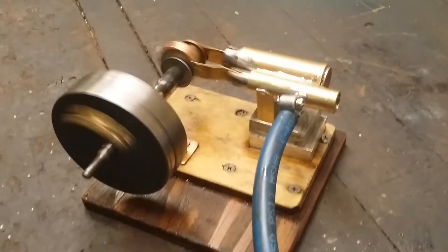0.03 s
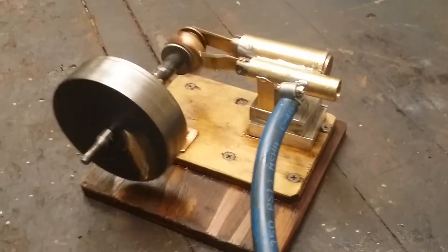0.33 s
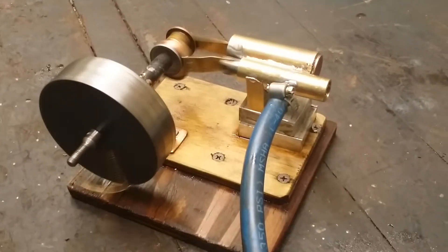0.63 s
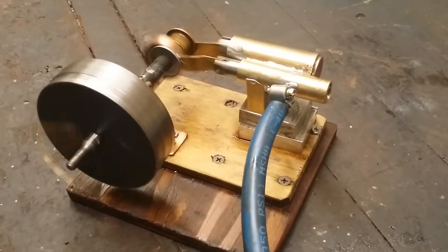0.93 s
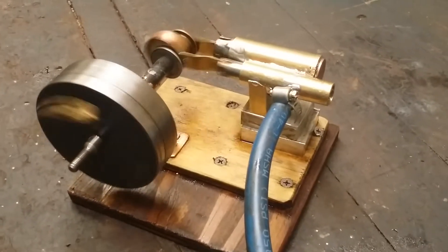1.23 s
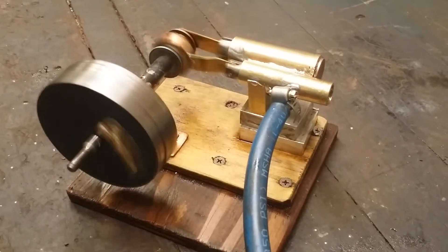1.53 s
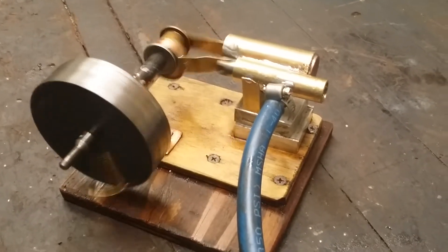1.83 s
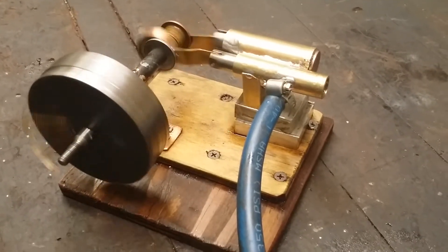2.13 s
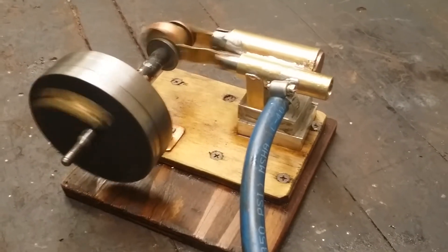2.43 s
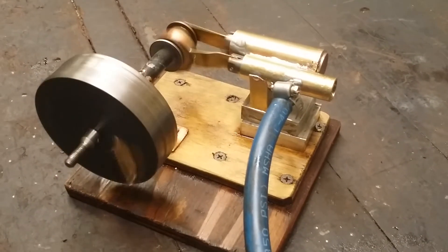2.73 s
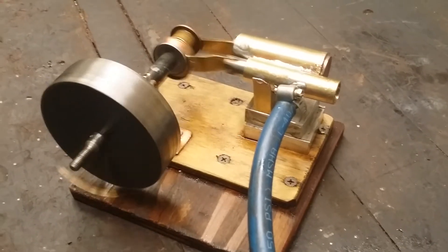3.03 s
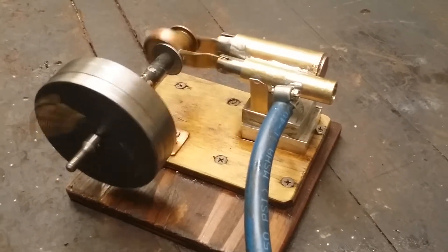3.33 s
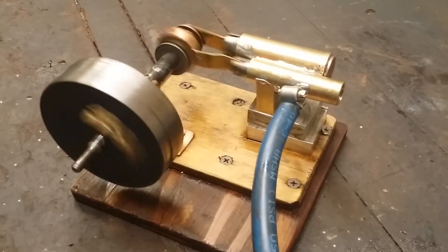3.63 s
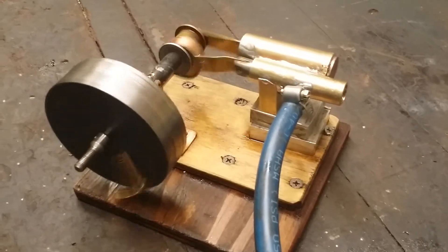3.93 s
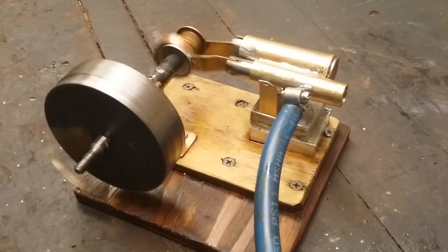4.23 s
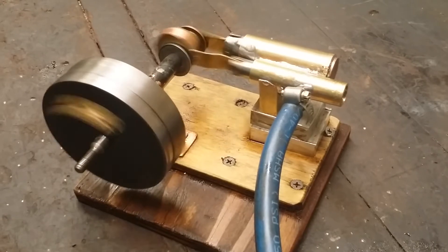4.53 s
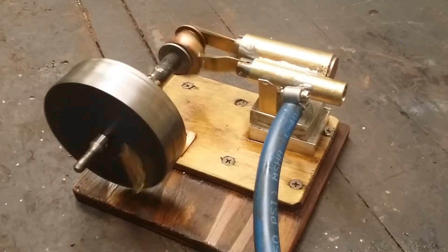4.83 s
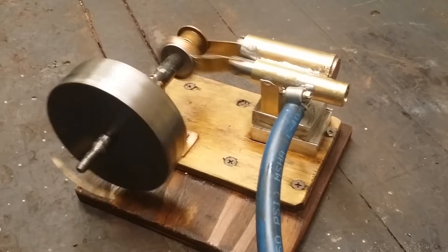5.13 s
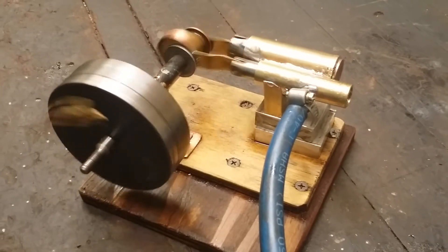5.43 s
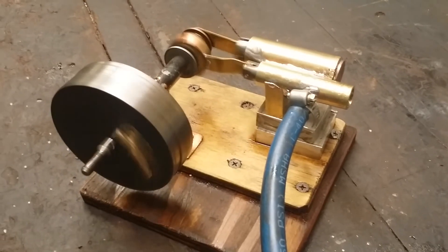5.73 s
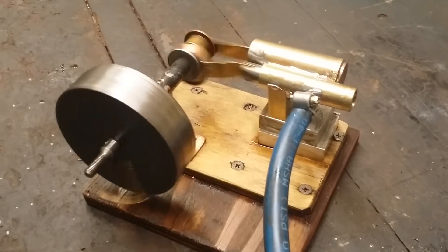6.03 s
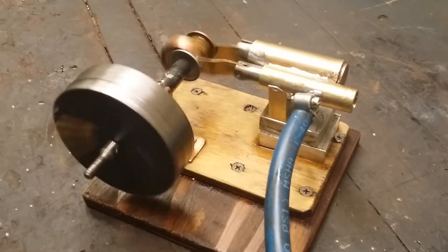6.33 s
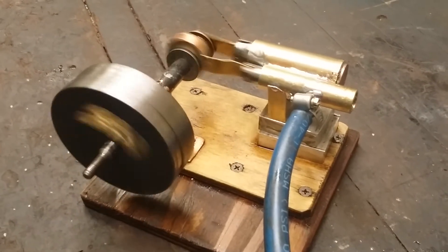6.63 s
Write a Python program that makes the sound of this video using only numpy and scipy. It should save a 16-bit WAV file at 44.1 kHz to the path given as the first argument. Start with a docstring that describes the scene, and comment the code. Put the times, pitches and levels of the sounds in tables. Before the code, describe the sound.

A small homemade piston engine, fed by a hose, runs throughout at almost six turns a second. Each turn gives a bright hiss from the valve, then a slightly duller exhaust puff with two light, high rattles of loose metal linkage. The shaft rumbles faintly into the base board. It is heard close up indoors, over a steady low hum and a faint whine.

```python
"""A small homemade piston engine, fed through a hose, turns its flywheel almost six times a second.
Each turn gives a bright jet at the valve, then a duller exhaust chuff with two rattles of loose linkage.
The shaft rumbles into the base board, over a low room hum. Two close microphones hear it with
reflections off the indoor floor, the right one more of the jet."""
import sys
import numpy as np
from scipy import signal
from scipy.fft import rfft, irfft, next_fast_len
from scipy.io import wavfile
from scipy.ndimage import map_coordinates

SR = 44100
rng = np.random.default_rng(int(sys.argv[2]) if len(sys.argv) > 2 else 0)


def wrap_up_sound(samples):
    """Save the sound to the file named by the first command line argument, as 16-bit audio."""
    columns = np.atleast_2d(samples).T
    # keep every value between -1 and 1, then stretch to whole-number steps
    tamed = np.clip(columns, -1, 1)
    steps = np.round(tamed * 32767).astype(np.int16)
    wavfile.write(sys.argv[1], SR, steps)


N = 295470


def amp(db):
    return 10 ** (np.asarray(db) / 20)


def wobble(rate_hz):
    """Smooth random curve, rate_hz knots a second."""
    knots = rng.standard_normal(int(N * rate_hz / SR) + 4)
    return map_coordinates(knots, [np.arange(N) * rate_hz / SR])


def curve(table):
    """A (time_s, value) table at every sample."""
    return np.interp(np.arange(N) / SR, *np.transpose(table))


def through_turn(table, angle):
    """An (angle_turns, level_db) table, repeated every turn."""
    return np.interp(angle, *np.transpose(table), period=1)


def each_turn(angle):
    """One random value per turn."""
    turn = angle.astype(int)
    return rng.standard_normal(turn[-1] + 1)[turn]


def along(table, hz):
    """Table columns read on a log-frequency axis."""
    table_hz, *columns = np.transpose(table)
    return np.array([np.interp(np.log(hz), np.log(table_hz), c) for c in columns])


def filtered(x, response):
    """x times a response of frequency."""
    size = next_fast_len(N + SR // 5)
    hz = np.fft.rfftfreq(size, 1 / SR) + 1
    return irfft(rfft(x, size) * response(hz), size)[..., :N]


def colour_db(hz):
    """Board, brass tubes and nearby surfaces colour the sound."""
    # peaks and notches: centre_hz, width_hz, left_db, right_db
    peaks = [(177, 9, 3, 4), (204, 9, 4, 2), (265, 13, 4, 3), (404, 16, 4, 2), (620, 45, 1, 2),
             (1664.0, 80.0, 4.6, 2.1), (2444.0, 239.0, 5.3, -2.5), (4020.0, 132.0, -3.6, 2.3),
             (4264.0, 85.0, -4.2, -3.2), (5154.0, 65.0, 2.8, -4.2), (5848.0, 156.0, 1.0, 3.8),
             (6293.0, 99.0, -2.2, -4.7), (6597.0, 144.0, 3.5, -2.9), (7015.0, 164.0, -0.6, -7.1),
             (7370.0, 148.0, -2.2, 3.6), (7870.0, 132.0, 0.3, 5.1), (9376.0, 146.0, -5.9, 1.5),
             (11170.0, 454.0, -3.7, 2.3), (12120.0, 213.0, 0.7, -5.7)]
    centre_hz, width_hz, *db = np.transpose(peaks)
    distance = np.minimum(np.abs(hz - centre_hz[:, None]) / width_hz[:, None], 10)
    return np.array(db) @ np.exp(-distance ** 2)


def radiate(drive, spectrum, direct=1, skirt_db_per_octave=60):
    """Shaped stereo noise of strength drive; direct scales the left-right coherence."""
    # microphone pair: freq_hz, coherence, left_lead_rad
    pair = [(190, .9, 0), (400, .5, 0), (750, .4, 0), (1400, -.27, 0), (2500, .05, 0), (3700, .6, .1),
            (4600, .55, .6), (5400, .6, -2.3), (6000, .8, -1.3), (6800, .72, -2.2), (8500, .45, -3.1),
            (10000, .45, -1.5), (11500, .35, -2), (13100, .7, -2.4)]

    def to_microphones(hz):
        coherence, lead_rad = along(pair, hz)
        coherence = np.clip(direct * coherence, -1, 1)
        mid, side = np.sqrt((1 + coherence) / 2), np.sqrt((1 - coherence) / 2)
        octaves_outside = np.abs(np.log2(hz / np.clip(hz, spectrum[0][0], spectrum[-1][0])))
        gain = amp(along(spectrum, hz) + colour_db(hz) - skirt_db_per_octave * octaves_outside)
        lead = np.exp(1j * lead_rad)
        return np.array([[mid * lead, side * lead], [mid, -side]]) * gain[:, None]
    noise = rng.standard_normal((2, N)) * np.sqrt(SR / 2)
    return filtered(noise * drive, to_microphones).sum(axis=1)


def crank(start_turns=0.519):
    """Crank angle in turns past valve opening; the flywheel slows a little."""
    # flywheel speed: time_s, turns_per_s
    speed = [(0, 5.932), (1.2, 5.877), (2.2, 5.727), (3.8, 5.734), (4.4, 5.624), (5.2, 5.697), (6.7, 5.667)]
    return start_turns + np.cumsum(curve(speed)) / SR


def exhaust(angle, turn_db, sputter_db=0.9, surge_db=0.86):
    """The returning piston pushes out a dull chuff that sputters and surges."""
    # outflow: angle_turns, level_db
    flow = [(0.03, -17), (0.34, -11), (0.578, 0.5), (0.601, -0.5), (0.651, 2), (0.769, -0.05), (0.887, 0.3),
            (0.978, -6.5)]
    # chuff: freq_hz, left_db, right_db
    spectrum = [(1800.0, -89, -102), (2950, -81, -75), (4030, -70, -66.5), (4790, -69.5, -69),
                (5630, -64, -64), (6720, -62, -62.5), (7950, -73, -62.0), (10300, -94.8, -96),
                (14000.0, -86.0, -73)]
    level_db = through_turn(flow, angle) + turn_db + sputter_db * wobble(400) + surge_db * wobble(90)
    return radiate(amp(level_db), spectrum, direct=1.3)


def jet(angle, turn_db, flutter_db=0.8, spit_db=7, spits_per_s=16, spit_s=0.0003):
    """The valve hisses and spits, long on the power stroke, briefly on the return."""
    # valve flow: angle_turns, level_db
    flow = [(-0.02, -15), (0.018, 1), (0.121, 3.5), (0.218, 2.3), (0.386, 1.8), (0.462, -5.5),
            (0.564, -11.5), (0.593, -1), (0.677, -3), (0.737, -11.5), (0.891, -12)]
    # hiss: freq_hz, left_db, right_db
    spectrum = [(2530, -100.9, -99.9), (3790, -80, -75.5), (6400, -69, -74), (8170, -79.0, -65.5),
                (10700, -72, -61.5), (11650, -73, -61), (12800, -67.5, -59), (14340, -72, -64.5)]
    # largest spits: start_s, boost_db
    big_spits = [(2.901, 16), (3.025, 12)]
    spits_db = (rng.random(N) < spits_per_s / SR) * rng.random(N) * spit_db
    for start_s, boost_db in big_spits:
        spits_db[round(start_s * SR)] = boost_db
    spits_db = np.convolve(spits_db, np.ones(round(spit_s * SR)), "same")
    level_db = through_turn(flow, angle) + turn_db + flutter_db * wobble(500) + spits_db
    return radiate(amp(level_db), spectrum)


def brighten(hiss, shelf_db, corner_hz=10500):
    """A harder jet gains most in its top."""
    top = filtered(hiss, lambda hz: 1 / (1 + (corner_hz / hz) ** 10))
    return hiss + (amp(shelf_db) - 1) * top


def slit(angle, turn_db, flutter_db=2.0, waver_db=1.33):
    """A narrow gap sizzles most as the port opens and closes."""
    # gap flow: angle_turns, level_db
    flow = [(0.018, 3), (0.075, -3.5), (0.167, -1.5), (0.3, -8.5), (0.421, 2), (0.55, -11.5), (0.824, -10),
            (0.977, -4.5)]
    # sizzle: freq_hz, left_db, right_db
    spectrum = [(4030, -74.5, -78.5), (6550, -77, -70), (7330, -66, -62.5), (8400, -72.5, -54),
                (9080, -73, -59), (11100, -77, -67.5), (14000.0, -90.4, -83.4)]
    # slow rise: time_s, level_db
    swell = [(0, -2.5), (1.9, -1), (3.5, 0.2), (5, 0.7), (6.7, 1.2)]
    level_db = through_turn(flow, angle) + turn_db + curve(swell)
    level_db += flutter_db * wobble(600) + waver_db * wobble(40)
    return radiate(amp(level_db), spectrum, direct=0.54)


def rattle(angle, turn_db, spectrum, at_turns, rise_turns, fall_turns, scatter_turns, chatter_db):
    """Linkage play is taken up near one crank angle in a burst of uneven contacts."""
    # turns where the linkage seats softly: time_s, level_db
    soft_turns = [(.55, -6), (.89, -8), (2.43, -2.5), (4.0, -3), (4.36, -3)]
    turn = angle.astype(int)
    seating_db = sum(db * (turn == turn[round(time_s * SR)]) for time_s, db in soft_turns)
    past_turns = angle % 1 - at_turns - scatter_turns * each_turn(angle)
    width_turns = np.where(past_turns < 0, rise_turns, fall_turns)
    burst = np.exp(-(past_turns / width_turns) ** 2 / 2)
    contacts = amp(chatter_db * wobble(700))
    contacts /= np.sqrt(np.mean(contacts ** 2))
    return radiate(amp(turn_db + seating_db) * burst * contacts, spectrum)


def tick(angle, turn_db):
    """First linkage rattle of a turn; grows unevenly, drops at the end."""
    # tick: freq_hz, left_db, right_db
    spectrum = [(2830, -103, -76), (4700, -72, -71), (6200, -54, -58.5), (7860, -102, -61),
                (8620, -69, -52), (10150, -85.2, -72), (14000.0, -83.6, -92)]
    # strength: time_s, level_db
    strength = [(0, -1), (1.3, 0), (3.2, 2.5), (4.5, 2.5), (5.2, 1), (6.15, 4), (6.7, -3)]
    return rattle(angle, turn_db + curve(strength), spectrum, at_turns=0.733,
                  rise_turns=0.011, fall_turns=0.025, scatter_turns=0.0064, chatter_db=2.3)


def clack(angle, turn_db):
    """Second linkage rattle, with smoother contacts."""
    # clack: freq_hz, left_db, right_db
    spectrum = [(2010, -75, -62.5), (3500.0, -90, -82), (5060, -68, -75.5), (6110, -47.5, -52),
                (7930, -84, -54), (9500.0, -83, -84.5), (14000.0, -95.0, -74)]
    return rattle(angle, turn_db, spectrum, at_turns=0.816,
                  rise_turns=0.012, fall_turns=0.024, scatter_turns=0.007, chatter_db=0.5)


def bearing(angle, turn_db, grit_db=0.45, shake_db=1.34):
    """The shaft rubs harder under load and shakes the base board."""
    # shaft load: angle_turns, level_db
    shaft_load = [(0.086, 0.47), (0.378, 1.36), (0.483, 1.2), (0.661, 0.3), (0.825, 2.9), (0.924, 3.5)]
    # shaft rub: freq_hz, left_db, right_db
    rub_spectrum = [(393, -73.5, -73.5), (690, -73, -67.5), (1060, -74, -70), (1666, -69, -65),
                    (2107, -76.5, -74.5), (2580, -86.5, -78.5), (5000.0, -94, -94)]
    # board rumble: freq_hz, left_db, right_db
    board_spectrum = [(130, -72, -63.5), (179, -69.5, -69), (252, -72.5, -67.5), (338, -76, -71)]
    load = amp(through_turn(shaft_load, angle) + turn_db)
    rub = radiate(load * amp(grit_db * wobble(250)), rub_spectrum)
    rumble = radiate(load * amp(shake_db * wobble(14)), board_spectrum)
    return rub + rumble


def room(hum_db=0.2, waver_db=2.2, swell_db=0.7):
    """Low noise, a hum whose close tones beat, and a faint, unsteady whine."""
    # background noise: freq_hz, left_db, right_db
    spectrum = [(21.1, -92, -88), (45, -84, -80), (60, -76, -71), (72, -75, -72.5), (89.5, -67.5, -62),
                (112, -75, -69), (140, -68.5, -62), (164, -74, -70.5), (254, -72, -69.5), (407, -77, -72)]
    # hum: pitch_hz, left_db, right_db
    hum_tones = [(118.15, -52, -47), (119.97, -58, -53), (121.2, -62, -57), (239.94, -52.5, -51),
                 (242.4, -62, -60)]
    # whine: pitch_hz, left_db, right_db
    whine_tones = [(359, -53.5, -66), (402, -60, -61.5), (715, -59, -58.5), (2382, -51.5, -74)]
    t = np.arange(N) / SR

    def tone(hz, drift_rad):
        return np.sqrt(2) * np.sin(2 * np.pi * (hz * t + rng.random()) + drift_rad * wobble(5))
    hum = sum(np.outer(amp(db), tone(hz, drift_rad=0.027)) for hz, *db in hum_tones)
    whine = sum(np.outer(amp(db), tone(hz, drift_rad=0.35) * amp(waver_db * wobble(6.7)))
                for hz, *db in whine_tones)
    return radiate(amp(swell_db * wobble(9)), spectrum) + amp(hum_db) * hum + whine


def floor_bounce(x):
    """Floor reflections comb the sound; the comb changes as the microphones drift."""
    # near reflections: delay_s, left_gain, right_gain
    near = [(.00136, 0, 0.14), (.001505, .08, 0.13), (.00239, 0.1, 0)]
    # far reflections: delay_s, left_gain, right_gain
    far = [(.00091, 0.056, 0), (.00103, 0, 0.048), (.00204, .05, .18), (.00241, .13, 0.065)]
    # microphone position: time_s, far_fraction
    drift = [(0, 0.36), (2.2, 0.0066), (4.2, 1), (6.7, 1)]

    def comb(echoes):
        return sum(np.array(gains)[:, None] * np.pad(x, [(0, 0), (round(delay_s * SR), 0)])[:, :N]
                   for delay_s, *gains in echoes)
    away = curve(drift)
    return x + (1 - away) * comb(near) + away * comb(far)


def walls(x, wet_db=-13, first_s=0.0034, t60_s=0.053):
    """Short, dense reverberation, different at each microphone."""
    t = np.arange(SR // 5) / SR
    tail = rng.standard_normal((2, len(t))) * amp(-60 * t / t60_s) * (t > first_s)
    tail /= np.linalg.norm(tail, axis=1, keepdims=True)
    return x + amp(wet_db) * signal.fftconvolve(x, tail, axes=1)[:, :N]


def scene():
    """Crank angle times the engine; supply pressure swells once and eases off."""
    # supply pressure: time_s, level_db
    supply = [(0, -0.2), (1.2, 0), (1.95, 1.84), (2.4, -0.3), (3.7, -.5), (6.7, -0.9)]
    angle, pressure_db = crank(), curve(supply)
    jet_db = pressure_db + 0.23 * each_turn(angle)
    exhaust_db = 0.49 * pressure_db + 0.73 * each_turn(angle)
    tick_db = each_turn(angle)
    clack_db = -1.6 + 1.2 * pressure_db + each_turn(angle)
    shelf_db = 0.35 * pressure_db + 0.3 * each_turn(angle)
    hiss = brighten(jet(angle, jet_db), shelf_db) + slit(angle, jet_db) + exhaust(angle, exhaust_db)
    linkage = tick(angle, tick_db) + clack(angle, clack_db)
    engine = floor_bounce(hiss + linkage) + bearing(angle, 0.6 * jet_db)
    return walls(engine) + room()


def record(dry):
    """Steep low-pass band limit."""
    top_hz = 14550
    return filtered(dry, lambda hz: 1 / (1 + (hz / top_hz) ** 400))


dry = scene()
out = record(dry)
wrap_up_sound(out)
```